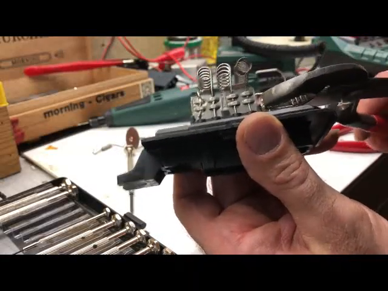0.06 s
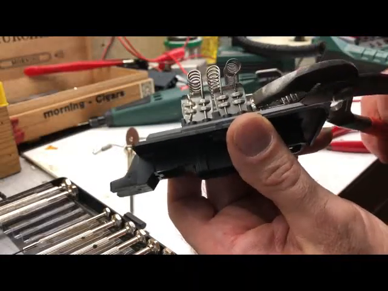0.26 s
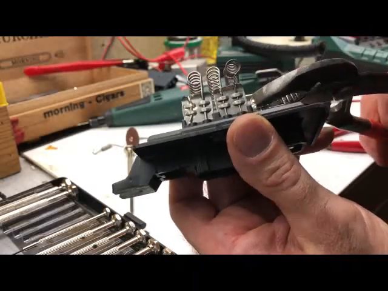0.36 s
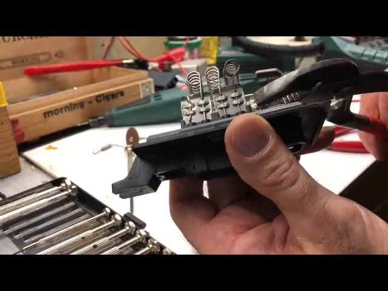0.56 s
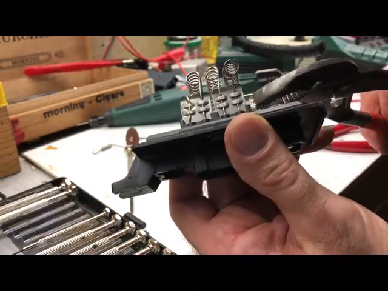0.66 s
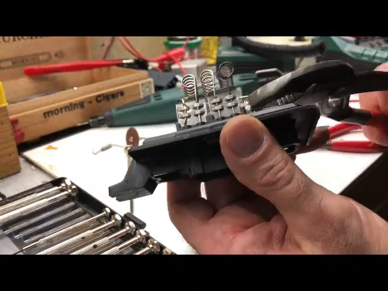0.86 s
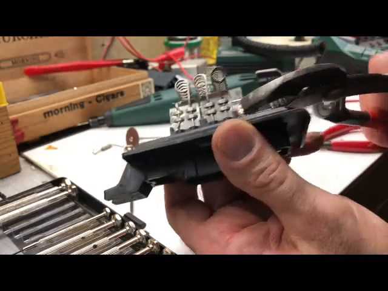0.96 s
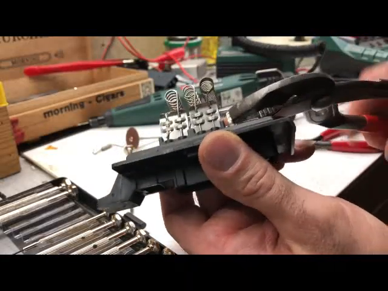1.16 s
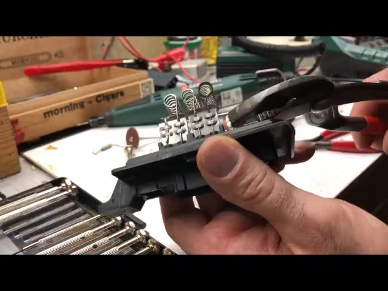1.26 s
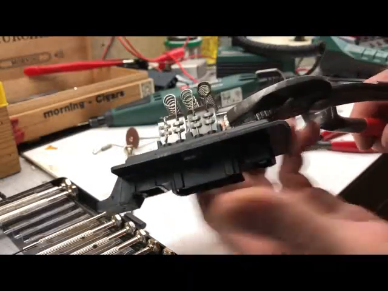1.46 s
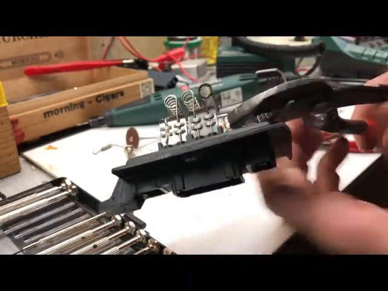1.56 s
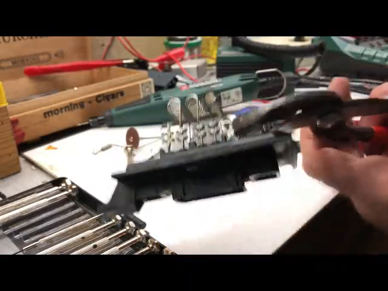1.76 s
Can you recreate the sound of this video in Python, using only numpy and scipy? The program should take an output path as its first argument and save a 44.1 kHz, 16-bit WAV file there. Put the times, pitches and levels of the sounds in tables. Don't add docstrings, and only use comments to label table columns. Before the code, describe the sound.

Pliers crimp a small metal leg with one sharp, loud crack, then faint ticks and rubs

```python
import sys
import numpy as np
from scipy import signal
from scipy.fft import rfft, irfft, next_fast_len
from scipy.io import wavfile
from scipy.ndimage import map_coordinates

SR = 44100
rng = np.random.default_rng(int(sys.argv[2]) if len(sys.argv) > 2 else 0)


def elevation(decibels):
    levels = np.asarray(decibels, float)
    return 10 ** (levels / 20)


def int16_out(signal):
    q = np.round(np.clip(np.atleast_2d(signal).T, -1, 1) * 32767)
    wavfile.write(sys.argv[1], SR, q.astype(np.int16))


N = 79380

# start_s, level_db
SNAP_CONTACTS = [
    (.2355, -14),
    (.2360, -3),
    (.2366, -11),
    (.2381, -12),
    (.2398, -18),
    (.2415, -26),
]
# freq_hz, level_db_per_hz
CRACK_SPECTRUM = [(180, -38), (300, -14), (1140, 0.5), (3300, -3.6), (6500, -5), (9500, -11),
                  (15500, -24.5)]


def unit(x):
    return x / np.sqrt(np.mean(x ** 2) + 1e-20)


def along(points, hz):
    f, v = np.transpose(points)
    return np.interp(np.log(hz + 1), np.log(f + 1), v)


def wobble(rate_hz, size):
    knots = rng.standard_normal(int(size * rate_hz / SR) + 4)
    return map_coordinates(knots, [np.arange(size) * rate_hz / SR])


def filtered(x, response):
    m = next_fast_len(len(x) + 2048)
    return irfft(rfft(x, m) * response(np.fft.rfftfreq(m, 1 / SR)), m)[:len(x)]


def hiss(spectrum, size):
    return unit(filtered(rng.standard_normal(size), lambda hz: elevation(along(spectrum, hz))))


def peak(hz, q):
    return lambda f: 1j * f * hz / q / (hz * hz - f * f + 1j * f * hz / q)


def ring(modes, t, scatter_db):
    out = np.zeros(len(t))
    for hz, db, t60_s in modes:
        level_db = db + scatter_db * rng.standard_normal() - 60 * t / t60_s
        out += elevation(level_db) * np.sin(2 * np.pi * hz * t)
    return out


def add(track, start_s, x):
    part = track[max(round(start_s * SR), 0):][:len(x)]
    part += x[:len(part)]


def background():
    # time_s, level_db
    rumble_swell = [(0.0, -64), (0.314, -59), (0.466, -69.5), (0.7, -64), (0.946, -66.5), (0.966, -78),
                    (1.002, -63.5), (1.228, -61.5), (1.298, -56.5), (1.402, -64.5), (1.508, -55.5),
                    (1.694, -67), (1.778, -61), (1.8, -71)]
    # freq_hz, level_db_per_hz
    rumble_spectrum = [(18, -29.5), (33, -2.5), (39, 2.5), (46, -6.5), (60, -8), (85, -6), (105, -38.5),
                       (150, -120)]
    # freq_hz, level_db_per_hz
    air_spectrum = [(30, -38), (70, -8.5), (125, -4), (240, -10.5), (420, -13), (800, -19), (1300, -26),
                    (4000, -29), (15500, -36.5)]
    air_db = -64
    time_s, level_db = np.transpose(rumble_swell)
    rumble = elevation(np.interp(np.arange(N) / SR, time_s, level_db)) * hiss(rumble_spectrum, N)
    air = elevation(air_db + .6 * wobble(4, N)) * hiss(air_spectrum, N)
    return rumble + air


def rubs():
    # start_s, length_s, level_db, centre_hz
    strokes = [(0.001, 0.11, -71.5, 1377), (.05, 0.017, -68, 4030), (0.152, 0.033, -63.5, 3000),
               (0.215, 0.019, -63, 2200), (1.262, 0.072, -70.5, 2330), (.73, 0.044, -68, 1720),
               (1.12, .035, -67, 10900), (1.451, 0.044, -64, 3600), (1.49, 0.082, -64, 3650),
               (.438, 0.0331, -65.5, 3154), (1.49, .06, -70.5, 9000), (1.497, 0.058, -64.5, 800),
               (1.583, 0.11, -65.5, 4500), (1.599, .088, -72.5, 12000), (1.78, 0.043, -64.5, 12000),
               (1.098, 0.7, -74.5, 1106), (1.693, 0.14, -73.5, 4210)]
    q, edge_s, grit_db, drift_db = 0.68, .01, 2, 1.5
    out = np.zeros(N)
    for start_s, length_s, db, hz in strokes:
        t = np.arange(round(length_s * SR)) / SR
        envelope = np.clip(np.minimum(t, length_s - t) / edge_s, 0, 1)
        level_db = grit_db * wobble(400, SR) + drift_db * wobble(50, SR)
        grit = rng.standard_normal(len(t)) * elevation(level_db[:len(t)])
        rub = unit(filtered(grit, lambda f: peak(hz, q)(f) ** 2))
        add(out, start_s, elevation(db) * envelope * rub)
    return out


def room(x):
    # freq_hz, t60_s
    decay = [(200, .2), (700, 0.19), (2000, .145), (5000, .14), (12000, 0.16)]
    # freq_hz, level_db
    tail_spectrum = [(120, 23), (250, 15), (600, 6), (1500, 1), (4000, -0.67), (8000, 1), (14000, 0.5)]
    gap_s, rise_s = .0125, .0015
    hz, t, z = signal.stft(rng.standard_normal(SR // 2), SR, nperseg=256)
    level_db = along(tail_spectrum, hz)[:, None] - 60 * t / along(decay, hz)[:, None]
    tail = signal.istft(z * elevation(level_db), SR, nperseg=256)[1]
    tail = tail * (1 - np.exp(-np.arange(len(tail)) / SR / rise_s))
    delayed = np.pad(x, (round(gap_s * SR), 0))
    return signal.fftconvolve(delayed, tail / np.linalg.norm(tail))[:N]


def ticks():
    # start_s, peak_db, pitch_hz, jaw_ring_db
    contacts = [(.0488, -55.5, 6030, -34), (.1235, -56.5, 3030, -17), (0.1468, -42, 4000, -5),
                (0.2073, -40.5, 3170, -21), (0.212, -50, 1770, -25), (0.4388, -48, 4350, -14),
                (0.4475, -34.5, 3630, -11), (.736, -64, 3050, -12), (.762, -58, 3500, -12),
                (1.092, -58.5, 6210, -15), (1.116, -48.5, 8200, -22), (1.1243, -51, 2950, 2.5),
                (1.138, -55.5, 5900, -9), (1.193, -58, 2040, -30), (1.2656, -47.5, 2670, -29.5),
                (1.276, -55.5, 9000, -30), (1.3064, -44, 2600, -36), (1.417, -51.5, 3520, -26),
                (1.437, -57, 3620, -18), (1.464, -61, 3500, -28), (1.4704, -42, 3640, -25),
                (1.483, -62, 3500, -25), (1.4966, -50.5, 3000, -6.5), (1.533, -59.5, 2000, -27),
                (1.5036, -63, 1027, -30), (1.5839, -44, 6800, -16), (1.611, -53, 13000, -32),
                (1.626, -57, 11000, -28), (1.682, -59, 12880, -31)]
    burst_t60_s, rise_s, body_q, click_db = .012, .00012, 3.2, -4
    jaw_hz, jaw_t60_s = 3822, .034
    out, t = np.zeros(N), np.arange(2000) / SR
    for start_s, db, hz, jaw_db in contacts:
        burst = rng.standard_normal(len(t)) * elevation(-60 * t / burst_t60_s) * (1 - np.exp(-t / rise_s))
        burst[:4] += 2.5
        body = filtered(burst, lambda f: peak(hz, body_q)(f) * peak(hz, 1.2)(f) / (1 + 1j * f / (1.5 * hz)) ** 2)
        click = filtered(burst, lambda f: (1j * f / (700 + 1j * f) / (1 + 1j * f / (1.7 * hz)) ** 2) ** 2)
        jaws = ring([(jaw_hz, jaw_db, jaw_t60_s)], t, scatter_db=0.5) * elevation(0.76 * wobble(300, len(t)))
        tick = body / abs(body).max() + elevation(click_db) * click / abs(click).max() + jaws
        add(out, start_s, elevation(db) * tick)
    return out


def springs():
    # freq_hz, level_db, t60_s
    coil_modes = [(4877, -7, 0.17), (5389, -8, 0.33), (6040, -9.5, 0.94), (7413, -12.5, 0.26),
                  (7580, 4.5, 0.04), (9259, -5, 0.12), (10900, -5.5, 0.13)]
    start_s, level_db, rise_s, stop_s, fade_s = .146, -56.5, .004, .062, .05
    out, t = np.zeros(N), np.arange(SR // 8) / SR
    envelope = (1 - np.exp(-t / rise_s)) * np.clip((stop_s - t) / fade_s, 0, 1)
    coils = ring(coil_modes, t, scatter_db=1.5) * elevation(4.5 * wobble(150, len(t)))
    add(out, start_s, elevation(level_db) * envelope * coils)
    return out


def snap():
    # freq_hz, level_db, t60_s
    holder_modes = [(640, -20.5, 0.024), (800, -12.5, .025), (1290, -5, 0.017), (1528, -9.5, 0.024),
                    (1954, -5, .015), (2576, 2, 0.011), (3215, 0.97, 0.013), (3450, -4.8, 0.022),
                    (5400, -4.5, .014), (6390, -5, .013), (7800, -3.5, 0.0075), (8840, -11.5, 0.015),
                    (10800, -13.5, 0.01), (12500, -21.5, .011)]
    # freq_hz, level_db, t60_s
    jaw_modes = [(1020, -4, 0.076), (3830, -1.5, 0.077)]
    holder_db, crack_db, crack_t60_s = -14, -7.5, 0.0099
    swell_db, swell_rise_s, swell_n = -41.5, 0.0012, 600
    jaws_db, jaws_rise_s, grip_s, grip_fade_s = -17, 0.00032, .0108, .0011
    small_hz = 517
    blows, jaws, t = np.zeros(N), np.zeros(N), np.arange(2000) / SR
    for contact_s, db in SNAP_CONTACTS:
        holder = elevation(holder_db) * ring(holder_modes, t, scatter_db=4.5)
        crack = elevation(crack_db - 60 * t / crack_t60_s) * hiss(CRACK_SPECTRUM, len(t))
        add(blows, contact_s, elevation(db) * (holder + crack))
    start_s = SNAP_CONTACTS[0][0]
    growth = np.exp(-t[:swell_n] / swell_rise_s)[::-1]
    add(blows, start_s - swell_n / SR, elevation(swell_db) * growth * hiss(CRACK_SPECTRUM, swell_n))
    grip = 1 / (1 + np.exp(np.clip((t - grip_s) / grip_fade_s * 2, -50, 50)))
    rise = 1 - np.exp(-t / jaws_rise_s)
    add(jaws, start_s, elevation(jaws_db) * grip * rise * ring(jaw_modes, t, scatter_db=1.5))
    blows = blows * np.pad(grip, (round(start_s * SR), N), constant_values=(1, 0))[:N]
    return filtered(blows, lambda f: (1j * f / (small_hz + 1j * f)) ** 3), jaws


def crack_at_walls(blows):
    heard = np.zeros(N)
    heard[round(SNAP_CONTACTS[1][0] * SR)] = np.linalg.norm(blows)
    return filtered(heard, lambda hz: elevation(along(CRACK_SPECTRUM, hz) + 4))


def release():
    start_s, level_db, freq_hz, t60_s = .4482, -43.5, 947, 0.025
    out, t = np.zeros(N), np.arange(2000) / SR
    add(out, start_s, ring([(freq_hz, level_db, t60_s)], t, scatter_db=0))
    return out


def scene():
    snap_room_db, light_room_db = -10.5, -21.5
    light = rubs() + ticks() + springs() + release()
    blows, jaws = snap()
    snap_heard = .25 * blows + crack_at_walls(blows)
    wet = room(elevation(snap_room_db) * snap_heard + elevation(light_room_db) * light)
    return (background() + light + blows + jaws + wet)[None]


def roll_off(x):
    return signal.sosfilt(signal.butter(12, 15920, fs=SR, output="sos"), x)


def record(dry):
    top_hz = 15200
    mix = filtered(dry[0], lambda hz: 1 / (1 + (hz / top_hz) ** 120))[None]
    return roll_off(mix)


dry = scene()
out = record(dry)
int16_out(out)
```